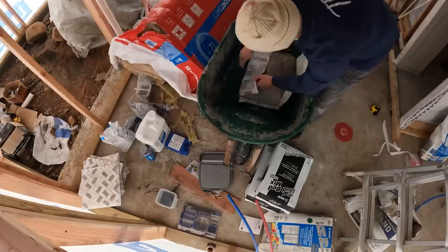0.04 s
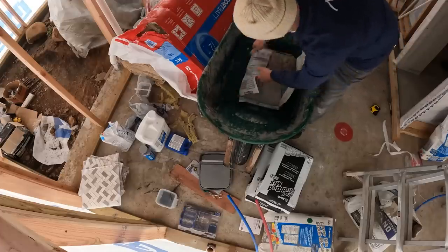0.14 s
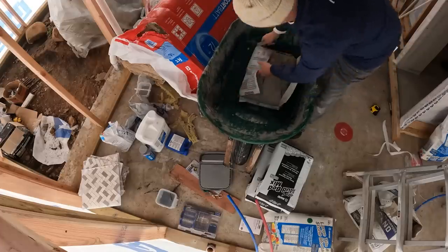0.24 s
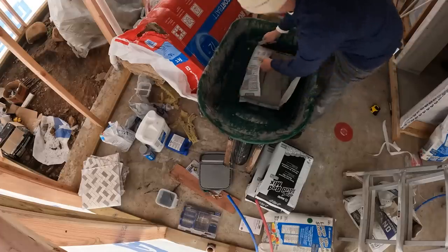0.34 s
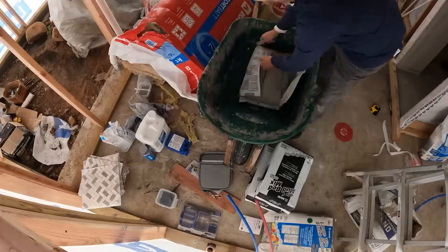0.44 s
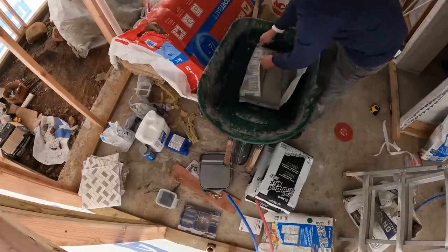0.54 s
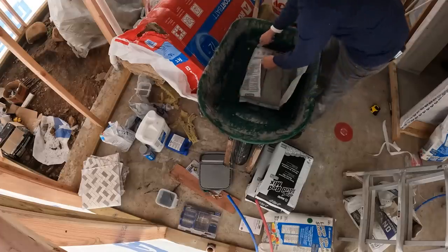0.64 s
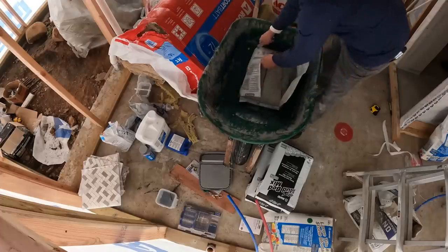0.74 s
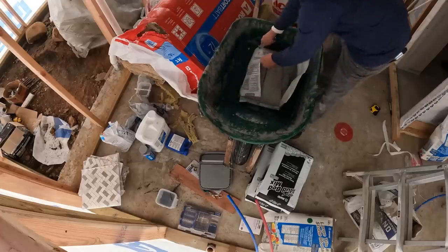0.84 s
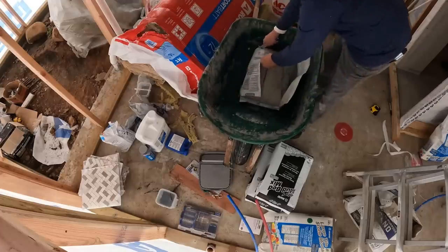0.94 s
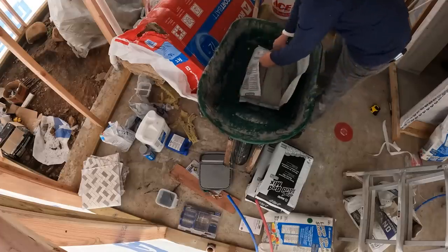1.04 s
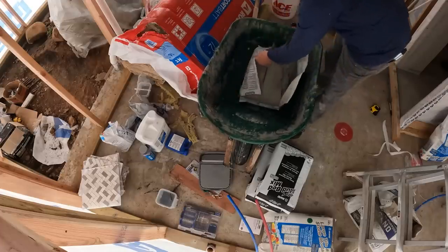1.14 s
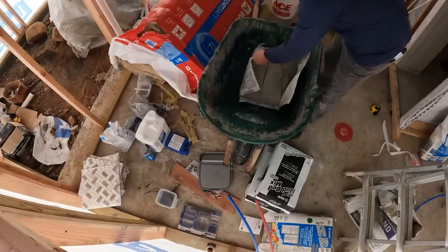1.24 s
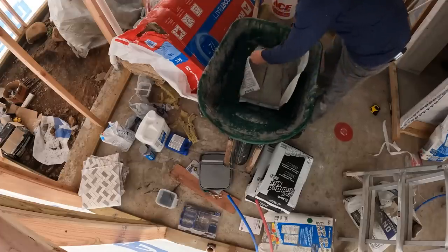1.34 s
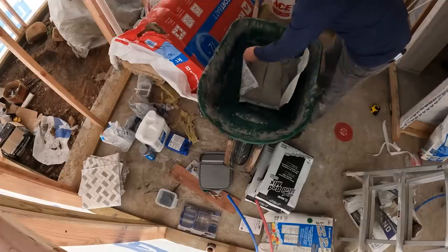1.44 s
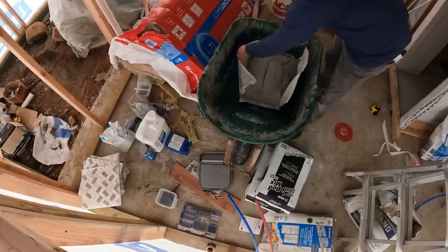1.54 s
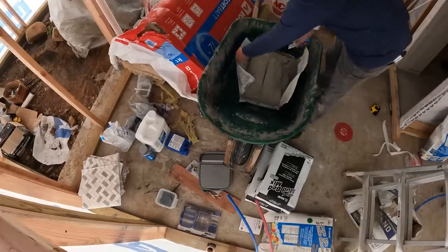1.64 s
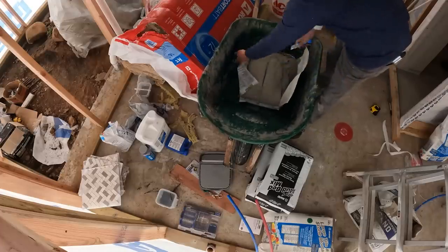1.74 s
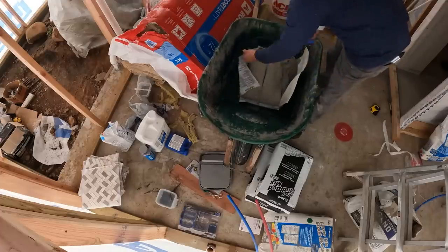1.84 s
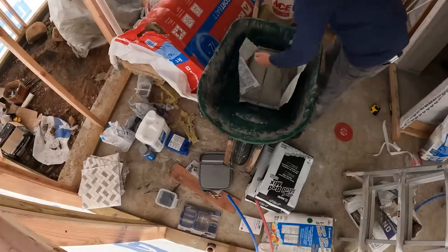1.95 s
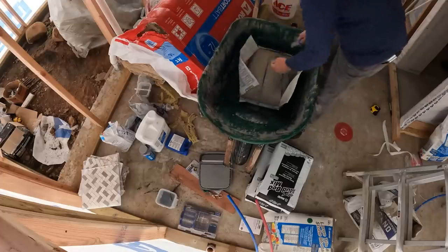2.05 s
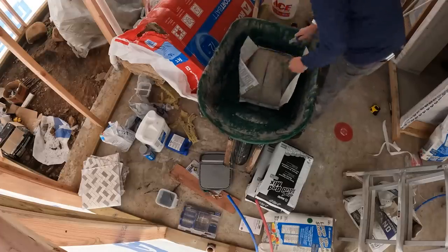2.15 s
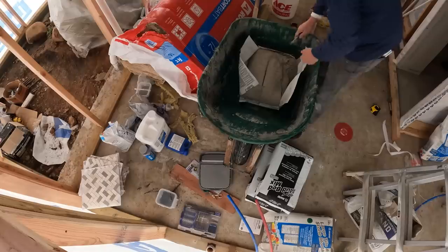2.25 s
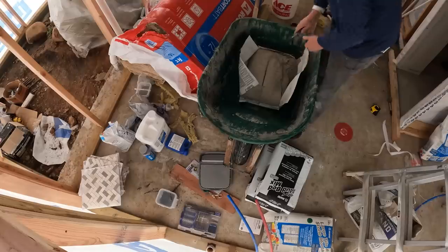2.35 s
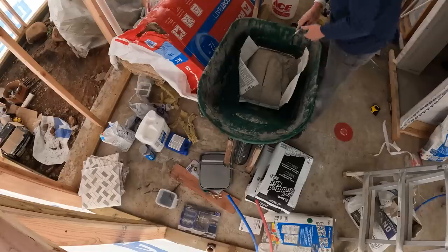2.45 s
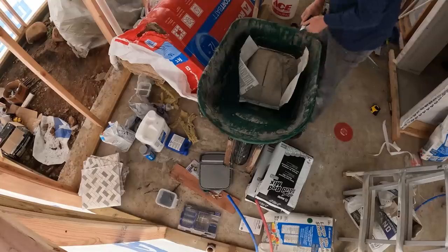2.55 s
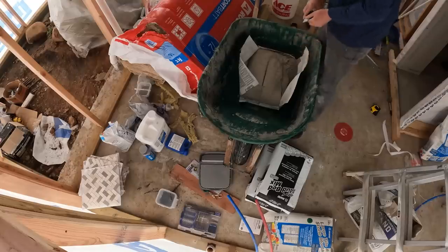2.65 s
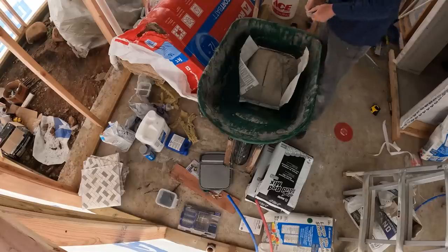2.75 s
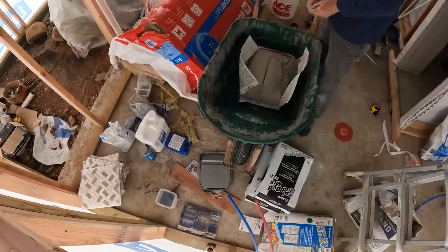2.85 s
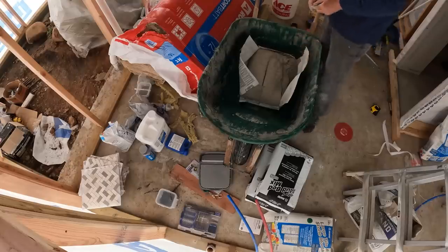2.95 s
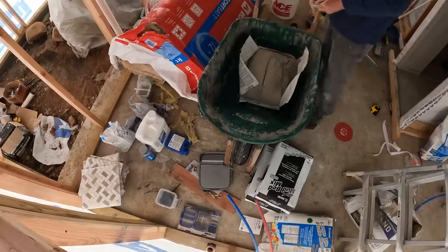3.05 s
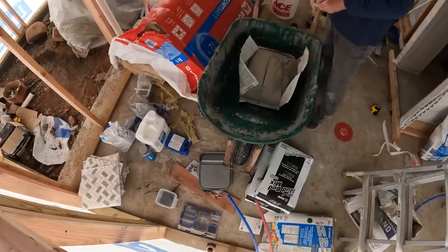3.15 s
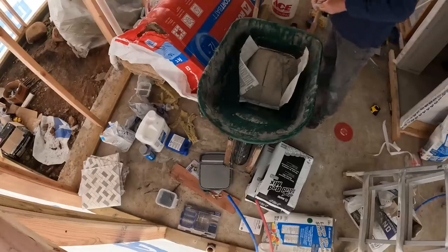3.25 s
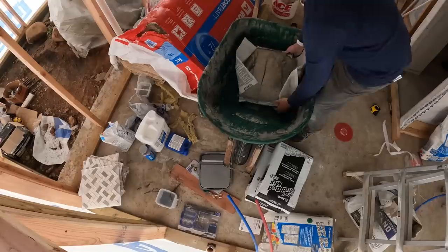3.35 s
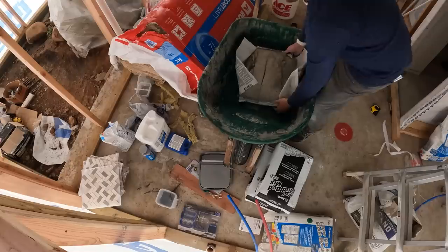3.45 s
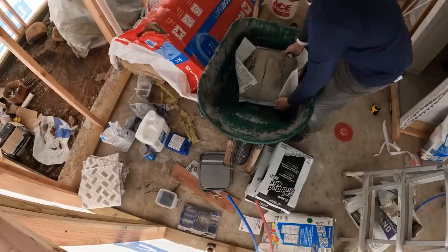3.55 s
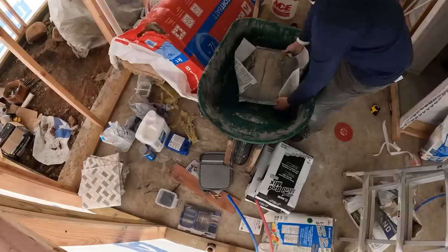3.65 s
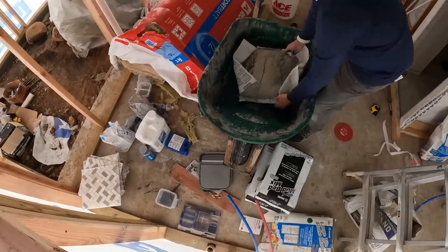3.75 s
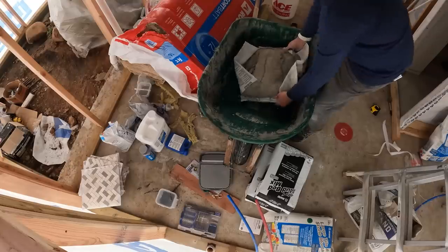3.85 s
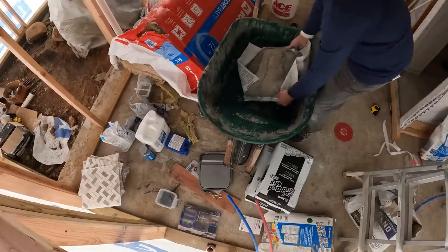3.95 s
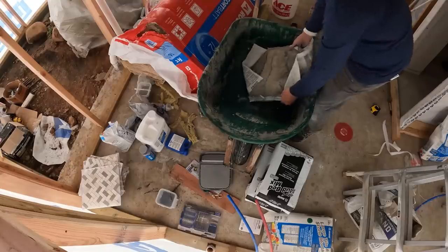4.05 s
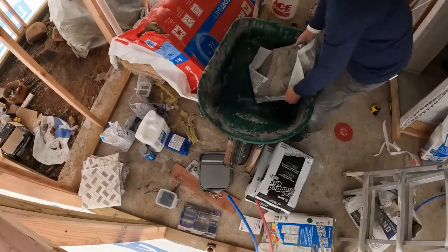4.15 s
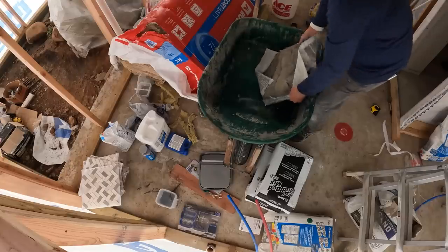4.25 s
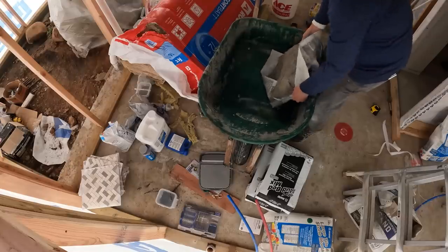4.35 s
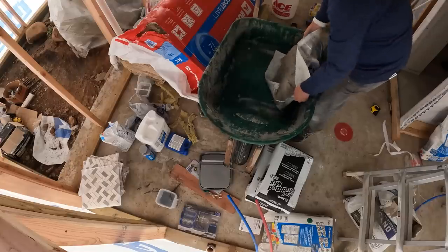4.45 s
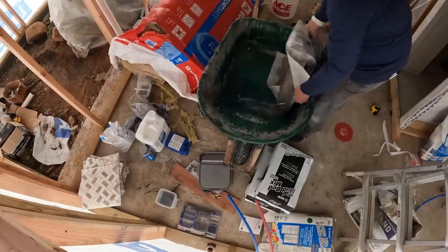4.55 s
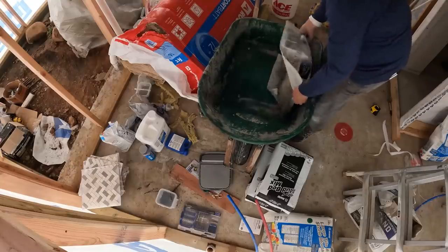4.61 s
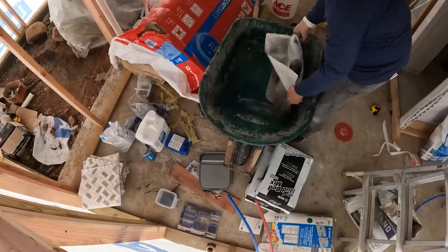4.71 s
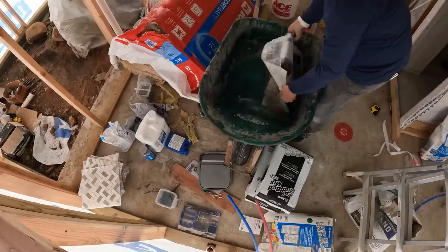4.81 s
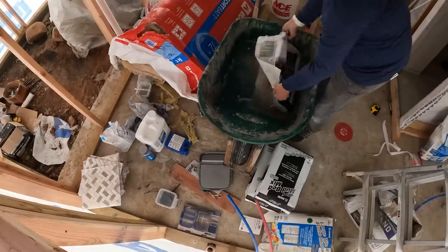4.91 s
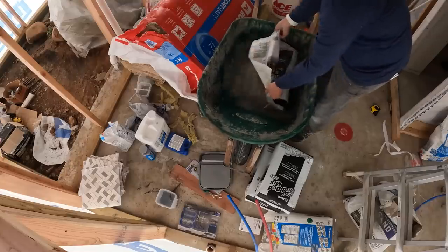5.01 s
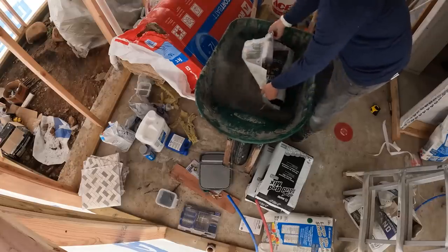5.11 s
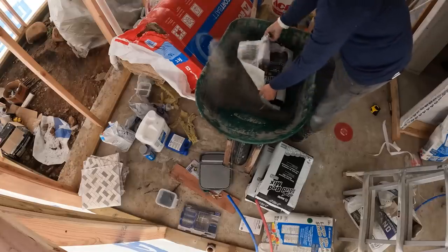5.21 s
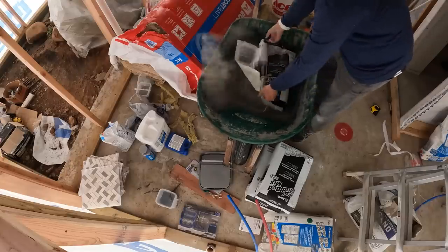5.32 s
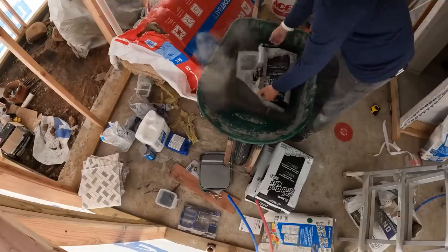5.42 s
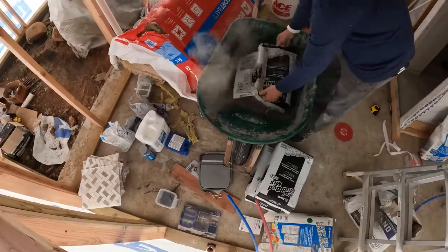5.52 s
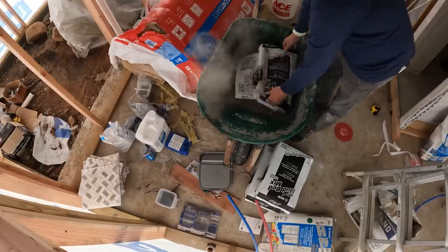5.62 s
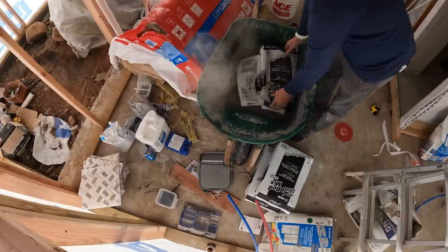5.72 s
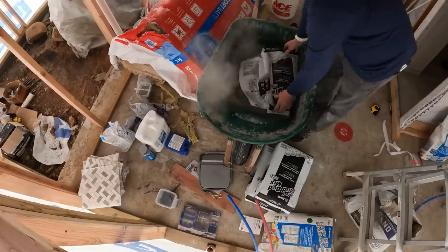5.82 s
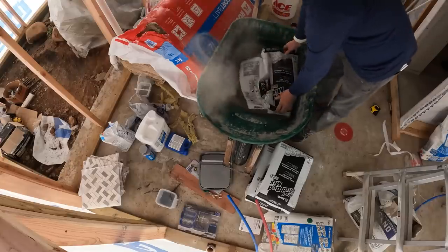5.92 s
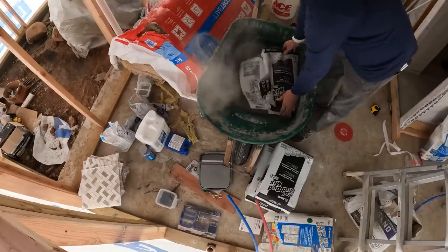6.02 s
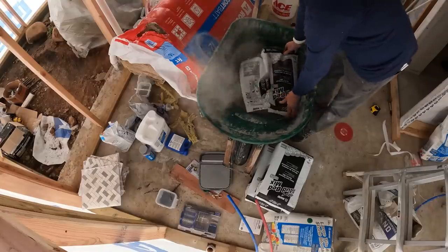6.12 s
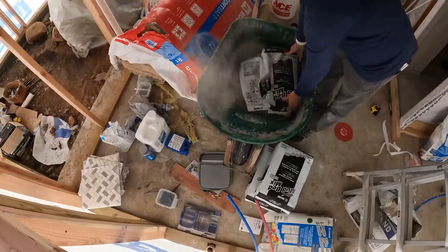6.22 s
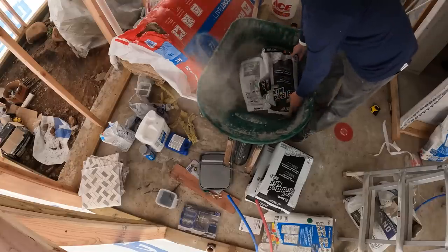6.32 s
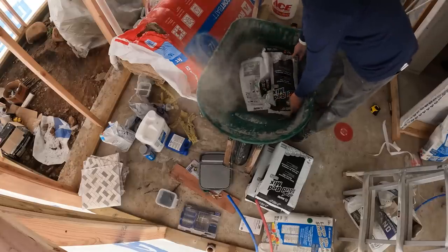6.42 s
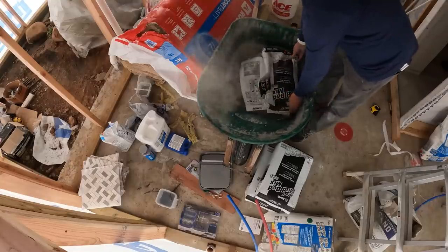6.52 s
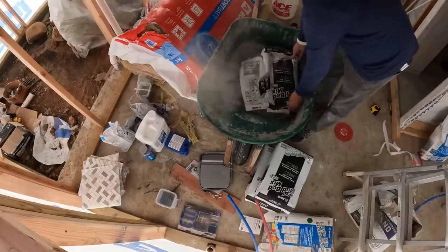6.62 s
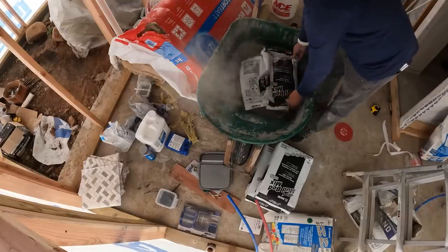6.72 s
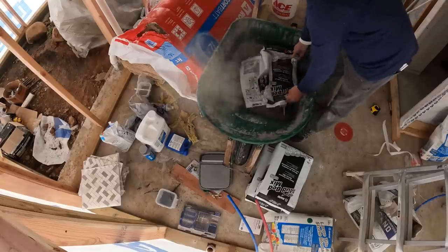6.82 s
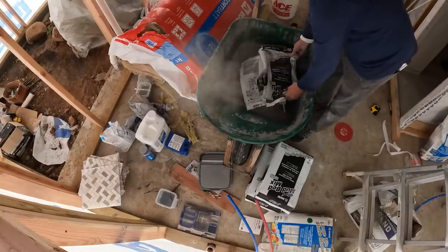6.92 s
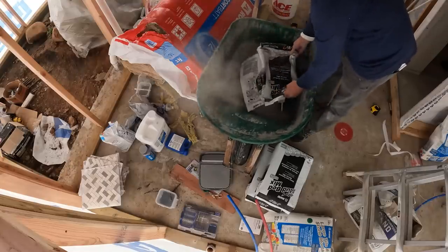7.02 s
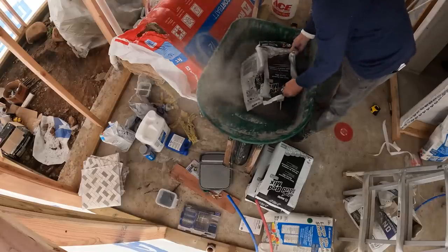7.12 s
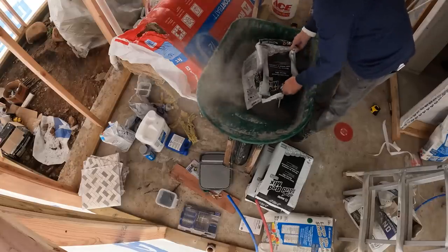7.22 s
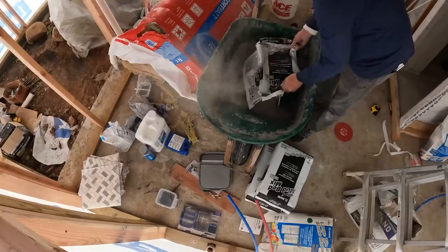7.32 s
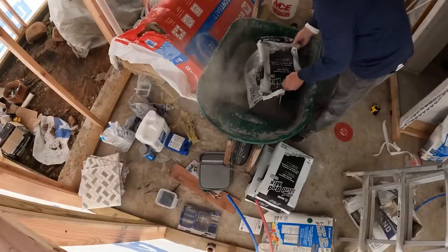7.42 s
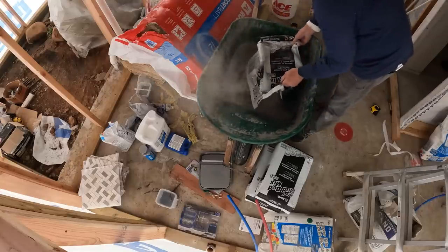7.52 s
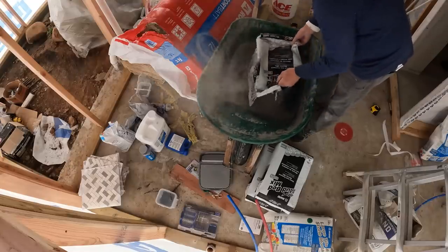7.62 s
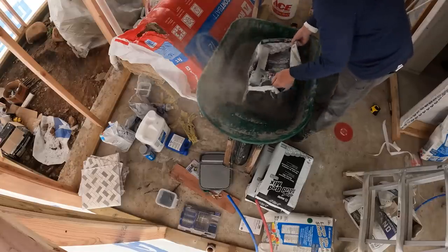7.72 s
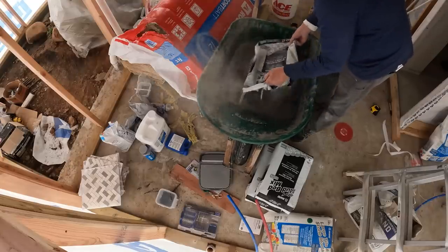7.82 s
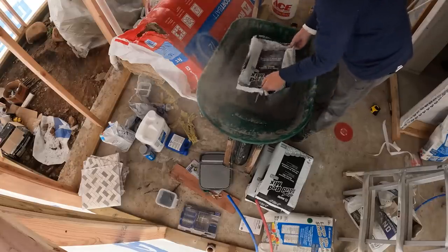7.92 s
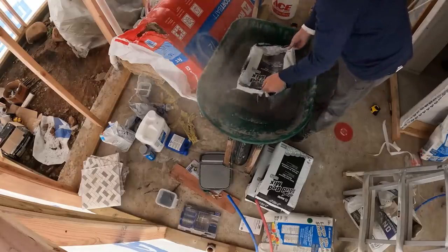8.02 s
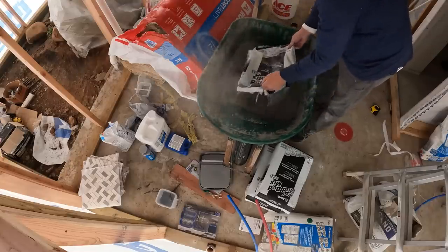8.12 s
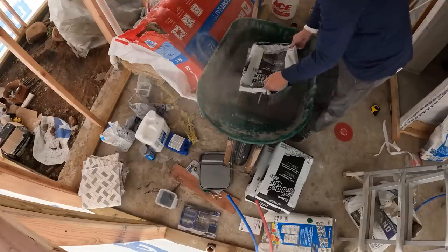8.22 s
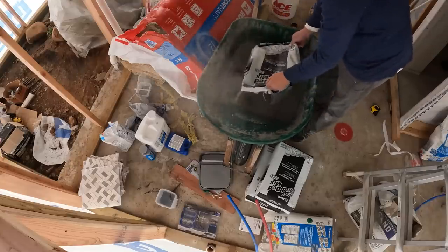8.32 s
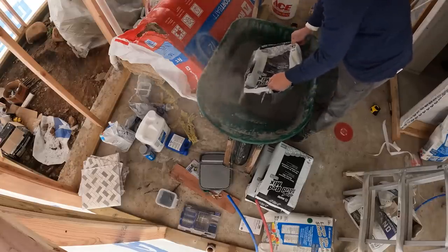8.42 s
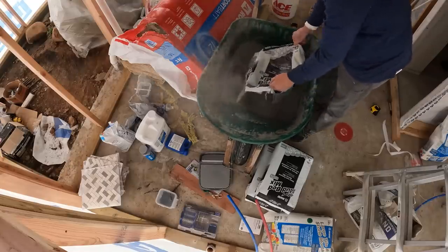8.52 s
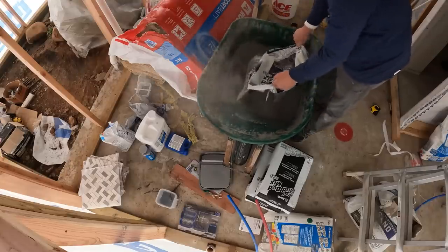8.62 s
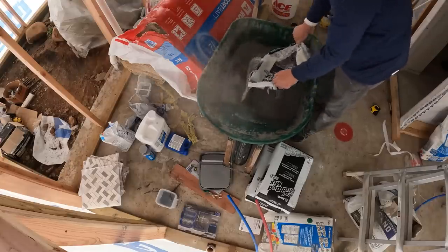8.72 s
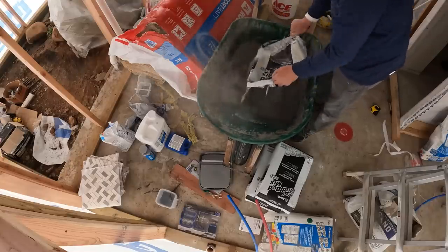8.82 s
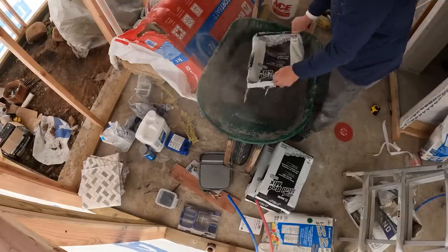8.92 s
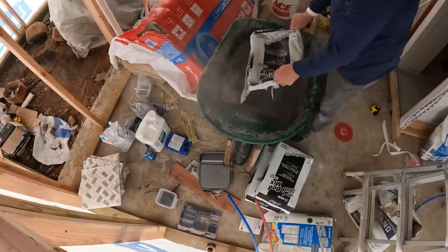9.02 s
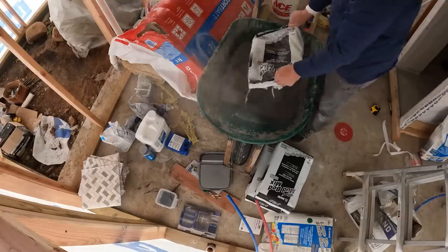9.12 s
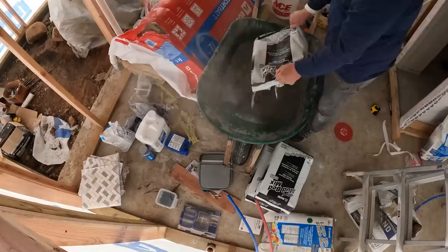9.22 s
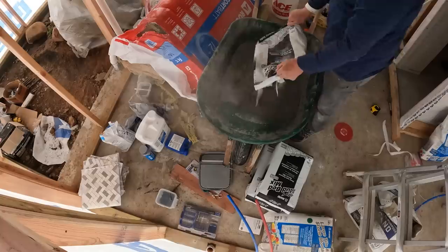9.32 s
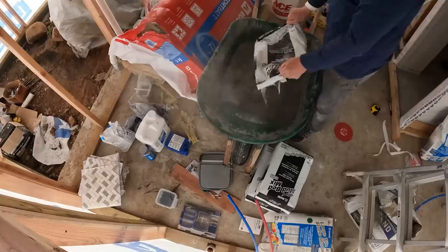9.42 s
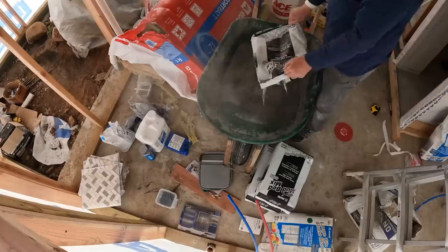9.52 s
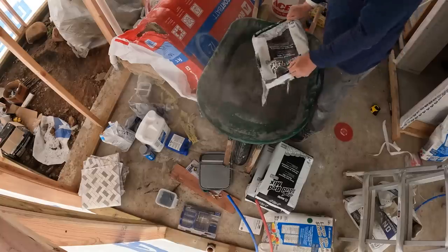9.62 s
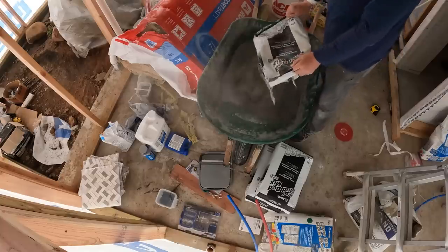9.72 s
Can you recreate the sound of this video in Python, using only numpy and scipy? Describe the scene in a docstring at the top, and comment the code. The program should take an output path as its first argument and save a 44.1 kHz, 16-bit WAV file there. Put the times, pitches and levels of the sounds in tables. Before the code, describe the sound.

Stiff paper crinkles and snaps as a sack of dry mortar is tipped, hissing and thumping, into a plastic wheelbarrow and shaken empty.

```python
"""A torn paper sack of dry mortar is emptied into a plastic wheelbarrow in a half-built room.
First, hands fold the stiff paper back: creases crinkle and snap, and the hollow sack knocks in answer.
Near 3 s, boots scrape and squeal on gritty concrete. From 3.8 s the sack is tipped: the mix hisses
down the paper, then slumps in waves and clods into the booming tub. From 5.5 s to the end the sack
is shaken empty, crackling and flapping, while the last sand trickles out."""
import sys
import numpy as np
from scipy import signal
from scipy.fft import rfft, irfft, next_fast_len
from scipy.io import wavfile
from scipy.ndimage import map_coordinates

SR = 44100
rng = np.random.default_rng(int(sys.argv[2]) if len(sys.argv) > 2 else 0)


def bounce(signal):
    """Save signal as a 16-bit WAV file at the path given by the first command-line argument."""
    frames = np.transpose(np.atleast_2d(signal))
    limited = np.clip(frames, -1, 1)
    pcm = np.round(limited * 32767).astype(np.int16)
    wavfile.write(sys.argv[1], SR, pcm)


N = 430416


def amp(db):
    """Decibels to gain."""
    return 10 ** (np.asarray(db) / 20)


def unit(x):
    """Scale to rms 1."""
    return x / np.sqrt(np.mean(x ** 2) + 1e-20)


def together(gains):
    """Unrelated sounds add in power."""
    return np.sqrt(sum(gain ** 2 for gain in gains))


def add(track, s, sound):
    """Mix a sound into the track at time s."""
    part = track[max(round(s * SR), 0):][:len(sound)]
    part += sound[:len(part)]


def along(points, hz):
    """Read a (frequency, value) curve on a log frequency axis."""
    knots_hz, values = np.transpose(points)
    return np.interp(np.log(hz + 1), np.log(knots_hz + 1), values)


def fader(rows, fade_db_per_s=84):
    """Gain that rides a (time, level) curve, fading in before it and out after it."""
    t = np.arange(N) / SR
    times, db = np.transpose(rows)
    outside = np.abs(t - np.clip(t, times[0], times[-1]))
    return amp(np.interp(t, times, db) - fade_db_per_s * outside)


def swell(s, rise, length, t60):
    """Envelope that rises from time s, holds until the length is over, then dies away."""
    t = np.arange(N) / SR - s
    return np.clip(t / rise, 0, 1) * amp(-60 * np.clip((t - length) / t60, 0, 2))


def strike(t, attack, t60):
    """Percussive envelope: a quick attack and an exponential decay."""
    return (1 - np.exp(-t / attack)) * amp(-60 * t / t60)


def wobble(rate):
    """A smooth random curve, rate knots a second."""
    knots = rng.standard_normal(int(N * rate / SR) + 4)
    return map_coordinates(knots, [np.arange(N) * rate / SR])


def hum(hz, rate, waver):
    """A mode shaken unevenly, so that its phase wanders; rms 1."""
    return unit(np.sin(2 * np.pi * hz * np.arange(N) / SR + waver * wobble(rate)))


def eq(x, gain_db):
    """Minimum-phase filter whose gain in dB is a function of frequency."""
    n = x.shape[-1]
    m = 2 * next_fast_len(n // 2 + 2048)
    cepstrum = irfft(np.log(amp(gain_db(np.fft.rfftfreq(m, 1 / SR)))), m)
    cepstrum[1:m // 2] *= 2
    cepstrum[m // 2 + 1:] = 0
    return irfft(rfft(x, m) * np.exp(rfft(cepstrum)), m)[..., :n]


def shaped(x, curve):
    """x through an EQ curve, at rms 1."""
    return unit(eq(x, lambda hz: along(curve, hz)))


def grains(rate, spread_db, t60):
    """Tiny noise bursts of uneven size at random moments, rate a second; rms 1."""
    sizes = amp(spread_db * np.minimum(rng.exponential(size=N), 3))
    hits = (rng.random(N) < rate / SR) * sizes ** 2
    energy = signal.lfilter([1], [1, -amp(-120 / (t60 * SR))], hits)
    return unit(np.sqrt(energy) * rng.standard_normal(N))


def panel(hz, pitch):
    """EQ bell of a paper panel's one broad resonance, in dB."""
    half_widths = (hz / pitch - 1) / 0.09
    return 10 * np.log10(1 + amp(8) ** 2 / (1 + half_widths ** 2))


def burst(envelope, curve, pitch=None, click=0):
    """Coloured noise with the envelope's shape and energy, plus an optional click and panel ring."""
    size = np.linalg.norm(envelope)
    noise = envelope * rng.standard_normal(len(envelope))
    noise[np.argmax(envelope)] += click * size
    x = eq(noise, lambda hz: along(curve, hz) + (panel(hz, pitch) if pitch else 0))
    return x * size / np.linalg.norm(x)


# reverb decay of the small room: (frequency [Hz], t60 [s])
ROOM_DECAY = [(100, 0.94), (500, 0.13), (4000, 0.098), (12000, 0.016)]
# EQ of the reverb's side signal: (frequency [Hz], gain [dB])
SIDE_EQ = [(60, -27), (300, -16), (600, -3), (7000, -0.5), (13000, -11)]


def room(x, wet_db, side_db):
    """Dry sound in the centre; diffuse echoes from floor and framing shift around it."""
    hz, t, spectra = signal.stft(rng.standard_normal((4, SR // 2)), SR, nperseg=256)
    decay = amp(-60 * t / along(ROOM_DECAY, hz)[:, None])
    tails = signal.istft(spectra * decay, SR, nperseg=256)[1]
    tails = np.pad(tails / np.linalg.norm(tails[0]), ((0, 0), (SR // 400, 0)))  # pre-delay
    echoes = signal.oaconvolve(x[None], tails, axes=1)[:, :N]
    turn = 2 * np.pi * np.arange(N) / SR  # two sets of echoes trade places smoothly
    mid, side = np.cos(turn) * echoes[:2] + np.sin(turn) * echoes[2:]
    mid = amp(wet_db) * mid
    side = amp(side_db) * eq(side, lambda f: along(SIDE_EQ, f))
    return np.array([x + mid + side, x + mid - side])


# bass-heavy ambience bed: (frequency [Hz], gain [dB])
AIR_EQ = [(20, -3), (55, -1.5), (90, -13), (160, -7), (270, -22), (400, -15.5), (600, -28), (3500, -36.5),
          (6500, -32.5), (15500, -57.5)]


def air():
    """Faint outdoor rumble through the open walls."""
    return amp(-56) * shaped(rng.standard_normal(N), AIR_EQ)


# soles scraping on concrete: (time [s], attack [s], length [s], level [dB], t60 [s])
SCUFFS = [(2.705, 0.13, 0.13, -47, 0.22), (2.803, 0.0082, 0.057, -37, 0.23),
          (3.193, 0.0064, 0.056, -44, 0.23)]
# crunch of grit underfoot: (frequency [Hz], gain [dB])
GRIT_EQ = [(100, -6), (750, -12), (1450, -3), (2100, -3), (7500, -16.5), (15000, -47)]
# a squeal drops from mode to mode as the sole slows: (time [s], length [s], pitch [Hz], level [dB])
SQUEALS = [(2.809, 0.041, 1477, -37.5), (2.827, 0.021, 1157, -35.5), (2.829, 0.035, 926, -41.5)]


def boots():
    """Fine grit rolls under a turning sole; the loudest scrape squeals roughly."""
    turning = together(amp(db) * swell(s, rise, length, t60) for s, rise, length, db, t60 in SCUFFS)
    squeal = sum(amp(db) * swell(s, 0.0018, length, t60=0.2) * hum(hz, rate=300, waver=0.7)
                 for s, length, hz, db in SQUEALS)
    return turning * shaped(grains(rate=2500, spread_db=1.5, t60=0.00635), GRIT_EQ) + squeal


# blows of sack, hands and boots that reach the tub: (time [s], level [dB], centre [Hz], thud t60 [s])
THUMPS = [(0, -38, 330, 0.59), (.819, -42, 201, 0.41), (1.109, -38.5, 129, 0.38), (1.22, -21.5, 304, 0.031),
          (1.808, -37, 447, 0.081), (2.105, -45.5, 330, 0.34), (2.141, -48.5, 106, 0.65),
          (2.86, -38.5, 262, 0.26), (3.423, -41, 380, 0.2), (3.6, -40.5, 298, 0.24),
          (3.694, -38.5, 395, 0.22), (3.893, -30.5, 317, 0.29), (6.234, -39.5, 130, 0.33),
          (7.793, -31, 322, 0.14)]
# soft contact, with no treble: (frequency [multiple of the centre], gain [dB])
THUD_EQ = [(.15, -23.5), (.5, -6.5), (1, -1.5), (3.2, -19), (30, -76.5)]
# ring of the plastic tub: (pitch [Hz], relative level [dB], t60 [s])
TUB_MODES = [(100, 1.5, 2.3), (143.5, 4, 0.92), (230, -6, 1.3), (310.5, -1.5, 1.66), (424, 3, 1.0),
             (525, 1.5, 1.25)]


def tub_thumps():
    """Each blow is a dull thud that rings the nearly symmetric tub in close, beating pairs of modes."""
    track, t = np.zeros(N), np.arange(2 * SR) / SR
    for s, db, centre_hz, thud_t60 in THUMPS:
        contact_eq = np.array(THUD_EQ) * [centre_hz, 1]
        thud = burst(strike(t, 0.00052, thud_t60), contact_eq)
        ring = 0
        for hz, mode_db, t60 in TUB_MODES:
            pair = sum(share * np.sin(2 * np.pi * (hz * detune * t + rng.random()))
                       for detune, share in [(0.993, 1), (1.02, 0.55)])
            ring += amp(mode_db + along(contact_eq, hz)) * strike(t, 0.0021, t60) * pair
        drive = amp(-26) * (thud_t60 / 0.2) ** 3  # a long push feeds the modes more than a tap
        add(track, s, amp(db) * (thud + drive * ring))
    return track


# sub-bass ride of the tub's lowest mode: (time [s], relative level [dB])
SWAY = [(0, -51), (2.0, -57.5), (2.65, -47), (3.25, -64.5), (4.0, -48.5), (5.1, -39), (5.95, -42),
        (6.1, -65), (6.4, -45), (8.3, -64)]


def tub_boom(slump):
    """The slumping load makes the floor boom; beneath it the whole tub sways unevenly."""
    boom = slump * hum(96, rate=14, waver=0.52)
    sway = unit(amp(1.7 * wobble(9.1)) * hum(60, rate=18, waver=0.95))
    return boom + amp(-3.5) * fader(SWAY) * sway


# packed lumps hit the tub's floor: (time [s], push level [dB], pitch [Hz], spatter level [dB])
CLODS = [(4.669, -13, 98, -23.5), (5.066, -6, 88, -23), (5.101, -26, 113, -32.5), (5.134, -10, 105, -34),
         (5.391, -20, 122, -19.5), (5.469, -23.5, 108, -33)]


def clods():
    """Each lump shoves the loaded floor through a few damped swings and bursts apart."""
    track, t = np.zeros(N), np.arange(SR // 3) / SR
    for s, push_db, hz, spatter_db in CLODS:
        push = np.sin(2 * np.pi * hz * t) * strike(t, attack=0.0053, t60=0.09)
        spatter = burst(amp(-60 * t / 0.17), np.array(THUD_EQ) * [270, 1])
        add(track, s, amp(push_db) * push + amp(spatter_db) * spatter)
    return track


# sand running down a fold: (time [s], length [s], peak level [dB], centre [Hz])
TRICKLES = [(0.188, 0.35, -43, 5100), (4.873, 0.12, -36, 7350), (5.119, 0.092, -36, 6800),
            (6.96, 0.522, -37.5, 6360), (7.474, 0.16, -33, 7140)]
# its thin hiss: (frequency [multiple of the centre], gain [dB])
TRICKLE_EQ = [(.05, -33.5), (.25, -4.5), (1, -0.5), (1.5, -6.5), (2.3, -24.5)]


def trickles():
    """Thin streams of fine sand swell as they gather speed, then run out."""
    track = np.zeros(N)
    for s, length, db, centre_hz in TRICKLES:
        stream = grains(rate=5900, spread_db=-1.5, t60=0.0057)
        hiss = shaped(stream, np.array(TRICKLE_EQ) * [centre_hz, 1])
        track += amp(db) * swell(s, length, length, t60=0.31) * hiss
    return track


# the mix leaving the sack: (time [s], level [dB])
FLOW = [(3.77, -47), (4.0, -33.5), (4.39, -30), (4.6, -33), (4.714, -33.5), (4.796, -39), (4.93, -36),
        (5.2, -38), (5.38, -45)]
# waves of mix collapsing onto the tub's floor: (time [s], length [s], level [dB])
SLUMPS = [(5.013, 0.12, -27), (5.228, 0.085, -27), (5.403, 0.038, -29.5), (6.222, 0.17, -44)]


def tipped_load():
    """The load slides out and slumps in waves: an envelope for each motion."""
    slump = together(amp(db) * swell(s, 0.024, length, t60=0.19) for s, length, db in SLUMPS)
    return fader(FLOW), slump


# bright hiss of sand on paper: (frequency [Hz], gain [dB])
SAND_EQ = [(100, -21.5), (370, 1), (600, -9), (950, -15), (1350, 1), (5000, 2), (7500, -1.5), (10000, -8.5),
           (13000, -16.5), (15700, -31)]
# the load's weight arriving in the tub: (time [s], relative level [dB])
LANDING = [(3.8, -53), (4.05, -32), (4.56, -47.5), (4.7, -34), (4.87, -50.5), (5.08, -32), (5.33, -44),
           (5.48, -41), (5.7, -46)]
# low patter of sand on plastic: (frequency [Hz], gain [dB])
PATTER_EQ = [(25, -47), (50, -33), (105, 0.5), (150, 1.5), (290, -6), (375, -3.5), (480, -12), (700, -11.5),
             (3000, -68)]


def pour(loosened, flow, slump):
    """Countless sand grains hiss down the paper; their weight drums on the tub."""
    sand = together([amp(3) * loosened, flow])
    weight = together([amp(1) * fader(LANDING), amp(-14) * slump])
    hiss = shaped(grains(rate=4000, spread_db=-2, t60=0.0054) * amp(1.4 * wobble(40)), SAND_EQ)
    drum = shaped(grains(rate=360, spread_db=-6, t60=0.086), PATTER_EQ)
    return sand * hiss + weight * drum


# resonances of the air in the open sack: (frequency [Hz], gain [dB])
CAVITY_EQ = [(500, -41.5), (950, -10.5), (1100, 1), (1280, 4.5), (1400, -5), (1560, 1), (1850, -25.5),
             (2550, -6.5), (3600, -40)]


def cavity(rubbing):
    """The rubbing paper keeps the air in the sack ringing in short, uneven bursts."""
    return amp(-7) * rubbing * shaped(grains(rate=510, spread_db=0.5, t60=0.015), CAVITY_EQ)


# the bulk of the load rubbing along the sack's wall: (time [s], level [dB])
SLIDE = [(4.1, -32.5), (4.33, -34.5), (4.5, -39)]


def slide(flow):
    """Grit dragging over the paper sounds the sack's shifting hollow; coarse grains tick against it."""
    drag = facets(grains(rate=1300, spread_db=1.5, t60=0.016))
    hollow = shaped(drag, CAVITY_EQ) * amp(1.5 * wobble(23))
    ticks = shaped(facets(grains(rate=260, spread_db=4, t60=0.006)), CREASE_EQ)
    return fader(SLIDE) * hollow + amp(-8) * flow * ticks


# low flutter of slack paper walls: (frequency [Hz], gain [dB])
FLAP_EQ = [(100, -26.5), (165, -0.5), (290, -2), (380, 3.5), (700, -31), (3000, -79)]


def flap(bending, empty_s=6.9):
    """Once empty, the loose walls of the sack flutter with every move."""
    empty = np.clip((np.arange(N) / SR - empty_s) / 0.28, 0, 1)
    flutter = shaped(grains(rate=460, spread_db=3.5, t60=0.011), FLAP_EQ)
    return amp(-7) * empty * bending * flutter


# hands fold, lift and shake the sack:
# (time [s], length [s], relative crinkle level [dB], relative sand level [dB])
STROKES = [(0.036, 0.82, -55, -57), (0.712, 0.022, -38, -67), (0.924, 0.18, -54.5, -51),
           (1.104, 0.039, -36, -34.5), (1.226, 0.061, -35.5, -40), (1.306, 0.6, -48.5, -54),
           (1.555, 0.11, -40.5, -74.5), (1.779, 0.061, -33, -35.5), (1.909, 0.06, -47.5, -45.5),
           (2.088, 0.17, -69, -70), (3.399, 0.044, -39.5, -43), (3.554, 0.15, -51.5, -51),
           (4.637, 0.047, -29.5, -38), (4.862, 0.037, -38.5, -34.5), (5.453, 0.057, -34, -41),
           (5.53, 0.67, -40.5, -47.5), (6.26, 1, -45, -49.5), (6.859, 0.33, -40.5, -45),
           (7.183, 0.82, -45.5, -49.5), (7.774, 0.097, -31.5, -35), (7.974, 0.22, -36.5, -46.5),
           (8.247, 0.3, -47, -53.5), (8.456, 0.047, -43.5, -45.5), (8.608, 0.29, -53.5, -57.5),
           (8.803, 0.062, -39.5, -47.5), (8.89, 1, -40.5, -49), (9.222, 0.039, -35, -48),
           (9.386, 0.033, -37, -45), (9.578, 0.22, -37.5, -46.5)]


def hand_strokes():
    """Each move of the hands bends the paper and loosens some sand: an envelope for each."""
    bending, loosened = [], []
    for s, length, crinkle_db, sand_db in STROKES:
        rise = min(0.3 * length, 0.039)  # short strokes start abruptly
        effort = swell(s, rise, length, t60=0.35)
        bending.append(amp(crinkle_db) * effort)
        loosened.append(amp(sand_db) * effort)
    return together(bending), together(loosened)


def facets(x):
    """Panels of paper change shape, so their resonances come and go."""
    spectra = signal.stft(x, nperseg=256)[2]
    blur = np.outer(np.hanning(7), np.hanning(7))
    drift = signal.fftconvolve(rng.standard_normal(spectra.shape), blur, "same")
    return signal.istft(spectra * amp(3 * np.tanh(unit(drift))), nperseg=256)[1][:N]


# midrange rustle of stiff paper: (frequency [Hz], gain [dB])
PAPER_EQ = [(60, -30.5), (200, -15), (370, 0), (560, -6), (850, -1), (1520, -1.5), (1900, -6.5),
            (2550, -6.5), (6000, -16), (10000, -44.5), (15500, -45.5)]


def crinkle(bending, flow):
    """Clumps of small creases give way as the paper bends; the sliding load only rubs it, evenly."""
    creases = unit(grains(rate=420, spread_db=-0.4, t60=0.012) * amp(11 * np.tanh(wobble(45))))
    rub = grains(rate=3000, spread_db=2, t60=0.0027)
    sheet = shaped(facets(creases + rub), PAPER_EQ)
    scrape = shaped(facets(grains(rate=1500, spread_db=2.5, t60=0.0039)), PAPER_EQ)
    return amp(-0.6) * bending * sheet + amp(-1.8) * flow * scrape


# boxy knock of the sack as a crease pops: (frequency [Hz], gain [dB])
HOLLOW_EQ = [(100, -26), (450, -8), (750, 5.5), (950, -3), (1250, 9), (1520, 0.5), (4000, -7), (12000, -66)]
BUCKLE_CLICK = 0.45  # the instant of buckling, relative to the crackle after it


def pops(bending, per_s=22, count=300):
    """Small buckles, each at its own pitch, knock unevenly in the sack's hollow while the paper bends."""
    times = np.cumsum(rng.uniform(0.3, 1.7, count)) / per_s
    track, t = np.zeros(N), np.arange(SR // 16) / SR
    for s, (size, octaves) in zip(times, rng.uniform(-1, 1, (count, 2))):
        envelope = amp(2 * size - 60 * t / 0.026)
        add(track, s, burst(envelope, HOLLOW_EQ, 1900 * 2 ** octaves, BUCKLE_CLICK))
    return amp(-5.5) * bending * unit(track)


# large creases buckle: (time [s], relative knock level [dB], relative crack level [dB], pitch [Hz])
SNAPS = [(0.538, -30.5, -53, 2430), (0.729, -28, -31.5, 2110), (0.78, -26, -59, 1194),
         (0.955, -28, -31, 5100), (1.051, -22.5, -36, 4210), (1.114, -37, -23, 3400),
         (1.22, -13, -19.5, 2400), (1.59, -28, -51, 1240), (1.642, -21.5, -56, 1640),
         (1.811, -18.5, -18.5, 3970), (1.844, -15, -23, 2880), (1.964, -23, -30.5, 4300),
         (1.996, -19.5, -36, 4460), (2.973, -53, -46, 4200), (3.404, -21.5, -30.5, 2080),
         (3.447, -18.5, -26, 4160), (3.74, -45, -37, 5640), (3.825, -42, -36, 2400),
         (3.907, -17, -26.5, 1550), (4.441, -26, -23, 3950), (4.561, -18, -29, 2080),
         (4.904, -16, -27, 5230), (5.153, -16, -31.5, 1150), (5.445, -16.5, -30.5, 2090),
         (5.508, -19, -26, 2080), (5.562, -14.5, -33, 1150), (5.619, -12.5, -27.5, 1190),
         (5.725, -16.5, -25, 1490), (5.765, -27, -27, 3570), (5.857, -17.5, -29.5, 1290),
         (5.918, -36, -27, 2850), (5.986, -18.5, -52, 1200), (6.071, -26, -35, 2530),
         (6.093, -22, -28, 4170), (6.139, -17.5, -36, 1220), (6.181, -16.5, -32.5, 3160),
         (6.418, -24.5, -30, 4930), (6.536, -17.5, -43, 1170), (6.588, -20.5, -40, 2990),
         (6.748, -16, -34, 2600), (6.759, -14.5, -43, 1280), (6.854, -23, -24.5, 3030),
         (6.876, -26, -25.5, 4780), (6.955, -20.5, -27.5, 4770), (6.998, -16.5, -28, 5300),
         (7.012, -25, -27, 3710), (7.061, -15, -28, 1270), (7.067, -17, -22.5, 5120),
         (7.107, -30, -25, 4390), (7.149, -23, -21, 5530), (7.801, -15.5, -24.5, 2530),
         (7.86, -15.5, -24, 1430), (8.324, -23.5, -35.5, 2560), (8.467, -23, -26, 3450),
         (8.502, -18.5, -27, 1210), (8.846, -21, -30, 2770), (8.94, -22, -22, 2540),
         (9.229, -20, -39, 1220), (9.588, -26, -25, 3010), (9.732, -20, -30, 2550)]
# crisp top of a breaking crease: (frequency [Hz], gain [dB])
CREASE_EQ = [(300, -38.5), (1500, 0.5), (2600, 5.5), (7500, 0.5), (10000, -10), (15500, -28)]


def snaps():
    """A crease gives way with a crack at its panel's pitch and a dry rustle; the hollow sack answers."""
    track, t = np.zeros(N), np.arange(SR // 8) / SR
    for s, knock_db, crack_db, hz in SNAPS:
        shape = 1 + rng.uniform(-0.11, 0.11)  # the sack is never twice the same shape
        knock = burst(strike(t, 0.00094, t60=0.03285), np.array(HOLLOW_EQ) * [shape, 1], hz, BUCKLE_CLICK)
        crack = burst(strike(t, 0.00056, t60=0.011), CREASE_EQ, hz, BUCKLE_CLICK)
        rustle = amp(-24.5) * burst(strike(t, 0.00056, t60=0.24), CREASE_EQ)
        add(track, s, amp(knock_db - 5) * knock + amp(crack_db + 9.5) * (crack + rustle))
    return track


def scene():
    """Hands and load drive paper, sand and tub, mixed on three room buses with the rustle driest."""
    bending, loosened = hand_strokes()
    flow, slump = tipped_load()
    rubbing = together([bending, amp(-10) * slump])  # each slump also drags on the paper
    sack = crinkle(rubbing, flow) + cavity(rubbing) + pops(bending) + flap(bending) + slide(flow)
    sand = pour(loosened, flow, slump) + trickles()
    rustle_bus = room(sack + sand + boots() + air(), wet_db=-13.5, side_db=-7.5)
    snap_bus = room(snaps(), wet_db=-9, side_db=-8.5)
    tub_bus = room(tub_thumps() + tub_boom(slump) + clods(), wet_db=-10.5, side_db=-10.5)
    return rustle_bus + snap_bus + tub_bus


# the treble leans left: (frequency [Hz], left boost and right cut [dB])
TREBLE_TILT = [(5000, 0), (13000, 1.5)]
LEFT_LAG_SAMPLES, TOP_HZ = 0.7, 15850


def record(dry):
    """The left channel is a little later and brighter; nothing is kept above the band limit."""
    m = next_fast_len(N + SR // 2)
    hz = np.fft.rfftfreq(m, 1 / SR)
    lag = np.exp(np.outer([-1, 1], 1j * np.pi * hz * LEFT_LAG_SAMPLES / SR))
    tilt = amp(np.outer([1, -1], along(TREBLE_TILT, hz)))
    return irfft(rfft(dry, m) * lag * tilt * (hz < TOP_HZ), m)[:, :N]


dry = scene()
out = record(dry)
bounce(out)
```